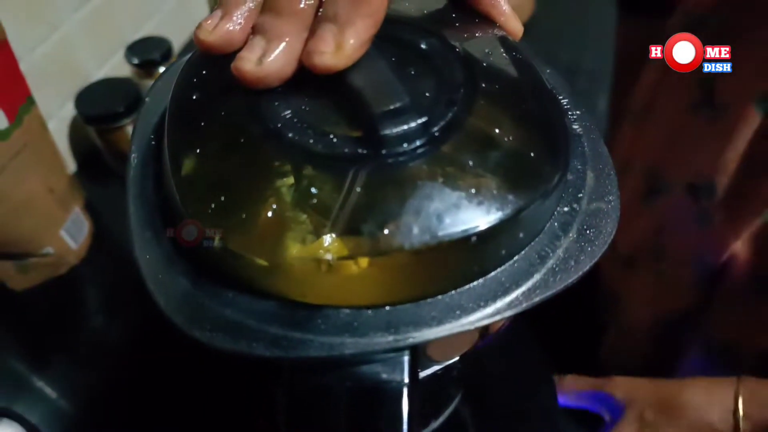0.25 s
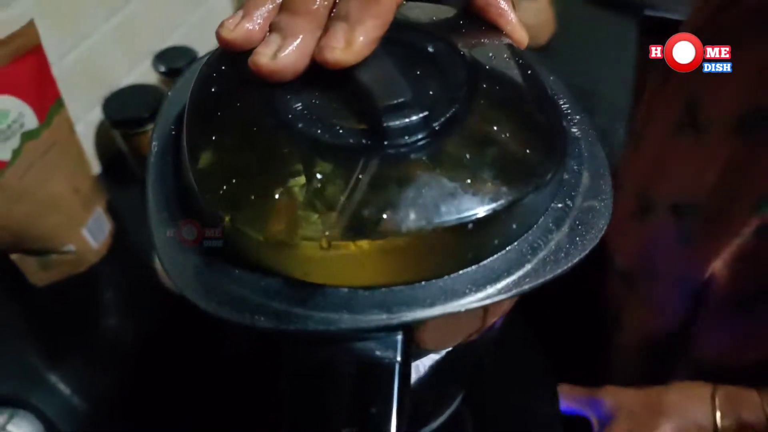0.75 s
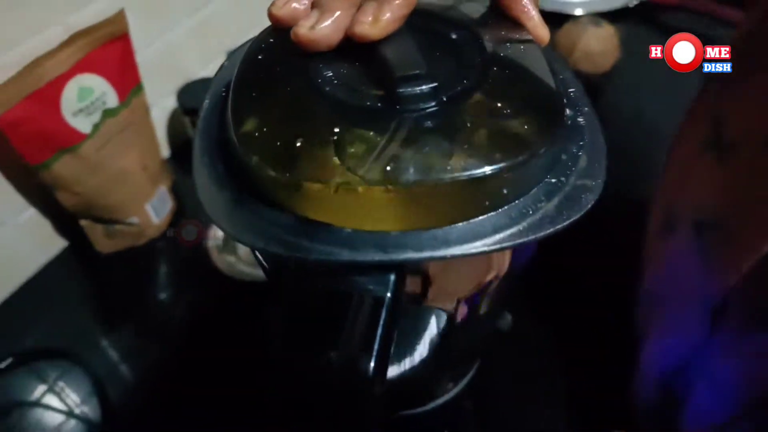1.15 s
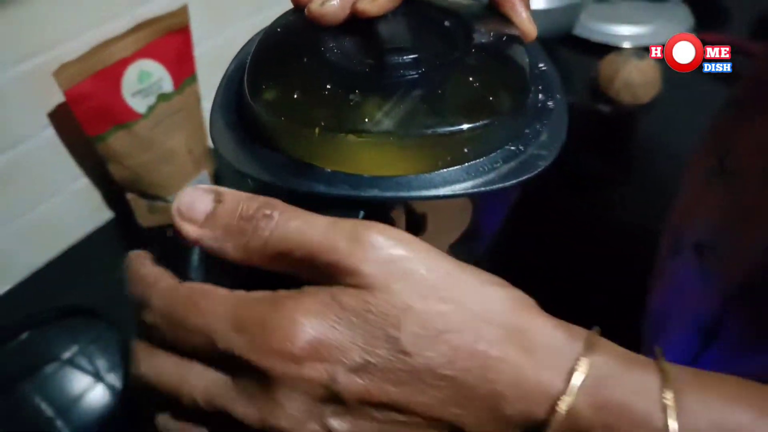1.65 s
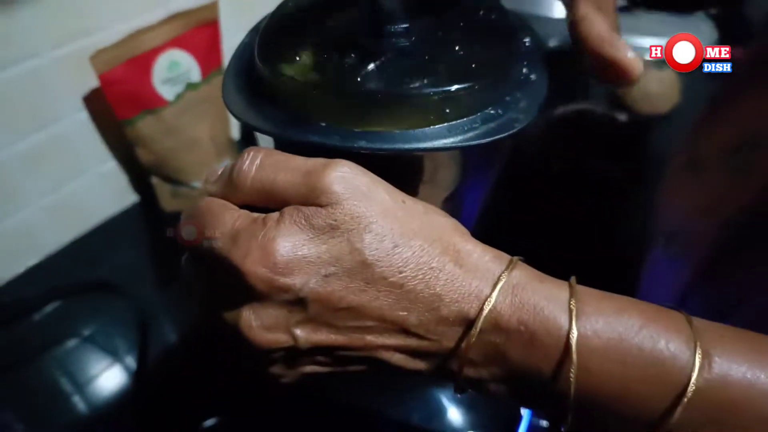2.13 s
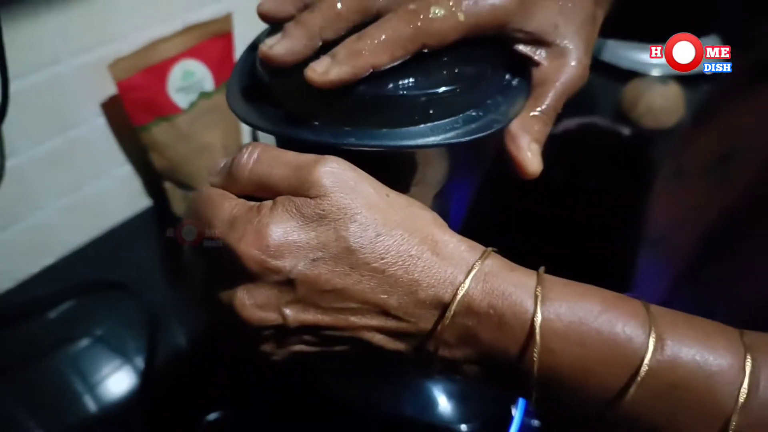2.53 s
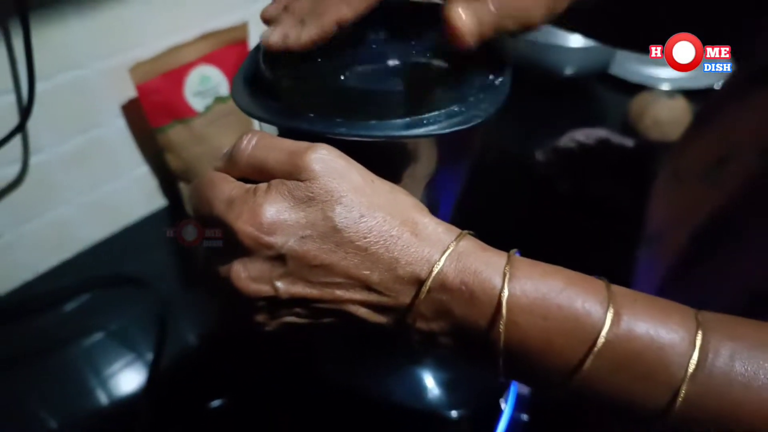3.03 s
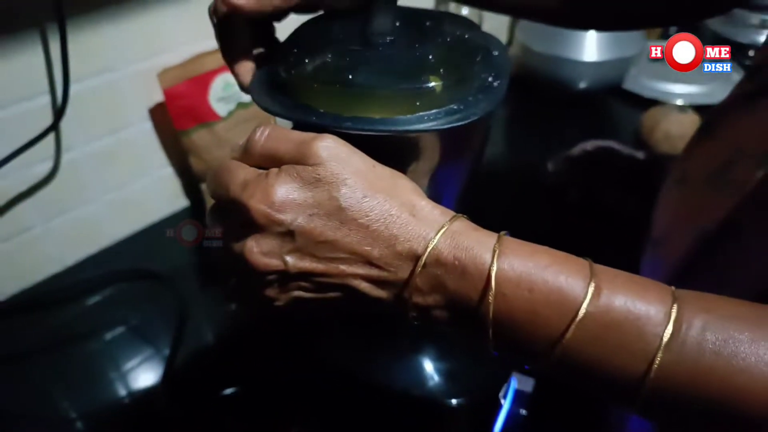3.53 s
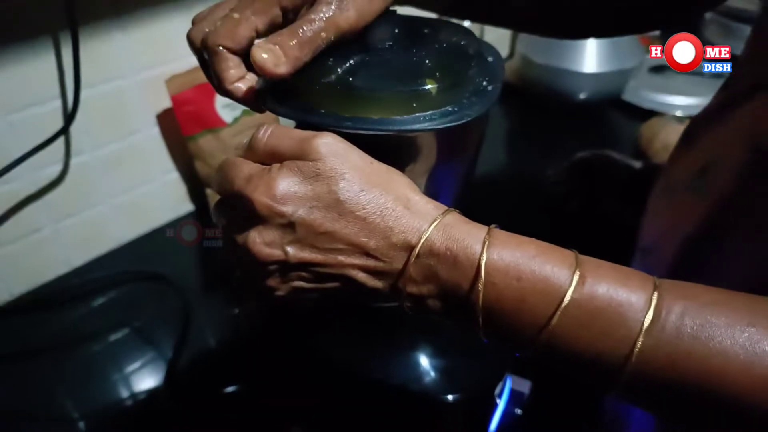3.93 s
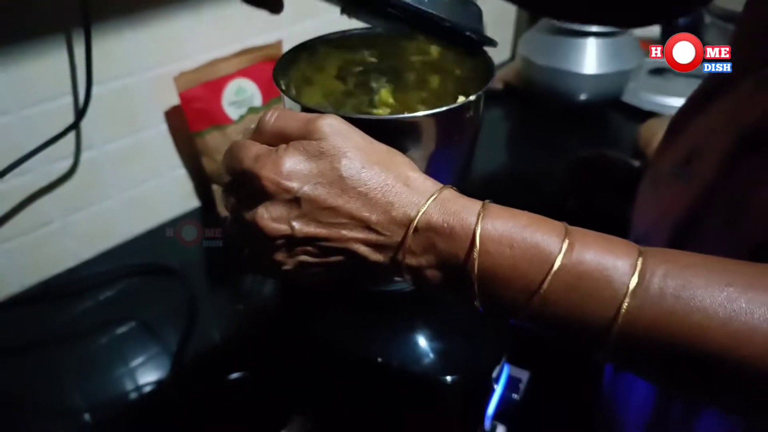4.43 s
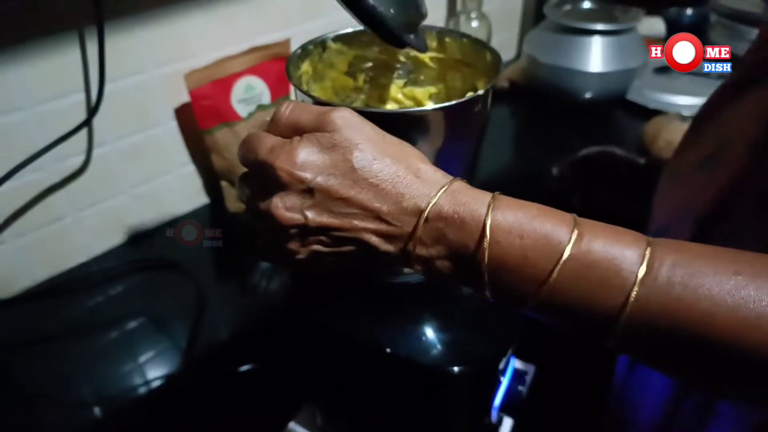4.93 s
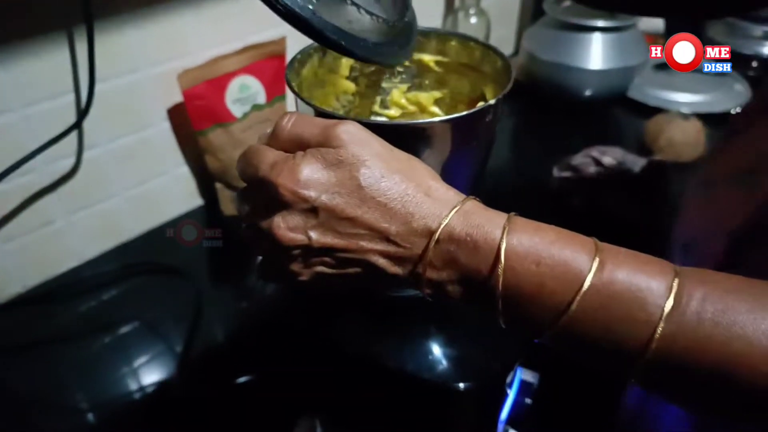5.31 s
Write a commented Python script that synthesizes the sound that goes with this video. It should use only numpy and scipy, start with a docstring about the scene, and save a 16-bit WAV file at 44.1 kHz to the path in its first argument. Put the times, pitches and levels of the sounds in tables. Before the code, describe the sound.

Close to a phone microphone in a small tiled kitchen, a thin hiss sits under a sharp knob click and soft thuds. Just after one second the mixer grinder lurches into motion, rattling and gurgling, then runs up quickly to a loud, rough whine. Wet lumps knock irregularly against the steel jar. Near the end the lid comes off and the roar becomes more open and bright.

```python
"""Mixer grinder in a small kitchen

The switch snaps and thuds, the drive stirs, then the motor runs up and its blade churns wet paste in a steel jar.
One shaft phase drives a hum, a whine and grinding noise, which rings the jar's air, wall and steel.
Lumps add blows and air pockets gurgle as gliding tones; a freer blade repeats more exactly turn by turn.
Near the end the lid is lifted and the jar takes its open, brighter colour. Short echoes of tiled walls
surround the machine, a thin steam-like hiss lies slightly right, and a phone rounds the peaks."""
import sys
import numpy as np
from scipy import signal
from scipy.fft import rfft, irfft, next_fast_len
from scipy.io import wavfile
from scipy.ndimage import uniform_filter1d, map_coordinates

SR = 44100
rng = np.random.default_rng(int(sys.argv[2]) if len(sys.argv) > 2 else 0)


def store_wav(level_fs):
    """Save 16-bit WAV to argv[1]."""
    pcm = np.round(np.clip(np.atleast_2d(level_fs), -1, 1) * 32767)
    wavfile.write(sys.argv[1], SR, pcm.T.astype(np.int16))


N = 245637
TIME_S = np.arange(N) / SR

# Background noise floor. Each row: frequency in Hz, relative density in dB per Hz.
FLOOR_COLOUR = [(60, -32), (150, 9), (900, -4), (1170, 9), (1400, -2), (3500, 4), (8000, -19)]
# Steam-like hiss. Each row: frequency in Hz, relative density in dB per Hz.
HISS_COLOUR = [(35, -67), (60, -32), (363, -24), (1380, -52), (2140, -33), (2300, -20.5), (3420, -50),
               (4640, -44.5), (7940, -27.5), (9350, -0.5), (10800, -27.5), (13900, -44), (16000, -40)]
# Whistling resonances of the hiss. Each row: centre in Hz, width in Hz, lift in dB.
HISS_WHISTLES = [(2400, 300, 9.8), (4720, 770, 23), (7250, 810, 14), (8430, 180, 13.5), (9760, 730, 4.9)]
# Decay of the kitchen's echoes. Each row: frequency in Hz, time to fall 60 dB in seconds.
KITCHEN_DECAY = [(200, 0.38), (2000, 0.14), (12000, 0.068)]
# Likeness of the two ears, clipped to -1..1. Each row: frequency in Hz, likeness.
EAR_LIKENESS = [(60, 0), (130, 1.8), (290, 0.6), (640, 0.74), (1410, 0.13), (3100, 0), (5000, -0.08),
                (7500, 0.83), (12000, 0.62)]
# Balance of the machine between the ears. Each row: frequency in Hz, left minus right in dB.
EAR_BALANCE = [(110, 6.5), (200, -2.5), (380, -1.5), (700, -1), (1290, 2.5), (2380, 1.5), (4400, -1.5),
               (8120, -0.5), (15000, 0)]

# Switch and drive contacts. Each row: start in seconds, click in dB, thud in dB.
CONTACTS = [(-0.008, -14, -48), (0.669, -16.5, -60), (0.67, -18.5, -50), (0.761, -48, -29),
            (0.817, -42, -42), (0.86, -39, -50), (1.004, -29.5, -30), (1.036, -27, -28)]
# Snap of the contacts. Each row: frequency in Hz, relative density in dB per Hz.
SNAP_COLOUR = [(180, -45), (300, -14), (440, -12), (1320, -24.5), (2070, -4), (2980, -11), (3240, -10),
               (6100, -5.5), (7440, -2.5), (11100, -9), (16000, -25)]
# Resonances of the knob. Each row: centre in Hz, width in Hz, lift in dB.
KNOB_MODES = [(2050, 270, 8.1), (4770, 260, 8.5), (7300, 250, 4.1)]
# Thud in the housing. Each row: frequency in Hz, relative density in dB per Hz.
THUD_COLOUR = [(60, -33), (130, -8), (215, 3), (330, -3), (480, -9), (800, -18), (1500, -25), (5000, -37)]

# The lid. Each row: time in seconds, opening from 0 to 1.
LID_OPENING = [(4.3, 0.01), (4.48, 0.99)]
# Resonances of the jar's base. Each row: centre in Hz, width in Hz, lift in dB.
BASE_MODES = [(1155, 62, 17), (1390, 300, 10)]
# Air pockets in the paste. Each row: middle in seconds, length in seconds, pitch at the middle in Hz,
# glide in Hz per second, level in dB.
AIR_POCKETS = [(1.14, 0.06, 415, -300, -25), (1.183, 0.035, 512, 300, -23), (1.225, 0.04, 432, 500, -23),
               (1.277, .03, 549, 2000, -26), (4.455, 0.054, 594, -400, -29), (4.551, .06, 565, 0, -30),
               (4.622, 0.14, 708, -200, -25.5)]
# Rumbling paste. Each row: frequency in Hz, relative density in dB per Hz.
PASTE_COLOUR = [(25, -43), (60, -42), (95, -40), (130, -3.5), (185, -1.5), (300, -1), (500, -10.5),
                (1500, -81)]
# Heavy paste heaving round the jar. Each row: time in seconds, relative level in dB.
HEAVE_LEVEL = [(1.1, -30), (1.26, -27), (1.34, -38), (3.05, -41.5), (3.15, -30.5), (3.5, -46), (4.36, -39),
               (4.44, -60), (5.51, -48), (5.57, -36)]
# Lumps passing the blade. Each row: middle in seconds, length in seconds, wall level in dB, steel level in dB.
LUMP_PASSES = [(1.157, 0.09, -30, -30), (1.442, 0.035, -20, -19), (1.6, 0.26, -24, -32),
               (1.792, 0.069, -20, -29), (1.95, 0.039, -17, -28), (2.074, 0.12, -21.5, -36),
               (2.19, 0.015, -16.5, -29), (2.344, 0.036, -16, -36), (2.466, 0.023, -19.5, -20),
               (2.53, 0.043, -18, -31), (2.644, 0.021, -24, -25), (2.75, 0.15, -20, -29),
               (2.99, 0.12, -26, -25), (3.074, 0.034, -22.5, -23.5), (3.167, 0.013, -17, -21),
               (3.224, 0.024, -20, -20), (3.324, 0.025, -20, -18), (3.417, 0.037, -23, -19),
               (3.688, 0.023, -17.5, -18), (3.875, 0.091, -20, -22.5), (4.04, 0.089, -20.5, -20.5),
               (4.186, 0.055, -19, -22.5), (4.565, 0.1, -21, -19.5), (4.855, 0.044, -23.5, -18),
               (4.985, 0.031, -19.5, -17.5), (5.1, 0.033, -17, -38), (5.444, 0.018, -17.5, -17.5)]

# Boom of the jar's air. Each row: frequency in Hz, relative density in dB per Hz.
BOOM_COLOUR = [(100, -64.5), (200, -9.5), (320, -6), (450, 4), (650, -4), (900, -1), (1300, -10.5),
               (3000, -64.5)]
# Air resonances tuned low, lid shut. Each row: centre in Hz, width in Hz, lift in dB.
AIR_LOW_SHUT = [(452, 70, 8.5), (608, 47, 10.5), (760, 190, -6)]
# Air resonances tuned low, lid open. Each row: centre in Hz, width in Hz, lift in dB.
AIR_LOW_OPEN = [(453, 26, 9.3), (738, 43, 10.2)]
# Air resonances with paste sloshing high, lid shut. Each row: centre in Hz, width in Hz, lift in dB.
AIR_HIGH_SHUT = [(485, 48, 3.5), (760, 230, -7.5)]
# Air resonances with paste sloshing high, lid open. Each row: centre in Hz, width in Hz, lift in dB.
AIR_HIGH_OPEN = [(492, 55, 10.5), (770, 150, 12)]
# Chopping on the jar's wall. Each row: frequency in Hz, relative density in dB per Hz.
CHOP_COLOUR = [(300, -26.5), (700, -7), (1000, -2.5), (1700, -1.5), (2400, 2), (3300, 2.5), (4800, -2),
               (6500, -4.5), (12000, -22)]
# Wall resonances, lid shut. Each row: centre in Hz, width in Hz, lift in dB.
WALL_SHUT = [(969, 42, 7.5), (1200, 290, 9.2), (1512, 210, 8), (1663, 60, 16.7), (1930, 200, 7.7),
             (2440, 55, 5.9), (2704, 35, 8.3)]
# Wall resonances, lid open. Each row: centre in Hz, width in Hz, lift in dB.
WALL_OPEN = [(1060, 59, -3), (1275, 64, 7), (1870, 180, 12.5), (4750, 270, 6.5)]
# Wall ring under a lump. Each row: frequency in Hz, relative density in dB per Hz.
RING_COLOUR = [(100, -39), (1300, -13.5), (1800, -5.5), (2300, -4), (5000, -28)]
# Paste flung at the steel, lid shut. Each row: frequency in Hz, relative density in dB per Hz.
SPRAY_SHUT = [(2000, -25.5), (4200, 0), (5500, 0.5), (7000, -1), (8400, 0), (8700, -4.5), (9600, -7),
              (11000, -11), (13000, -20.5), (16000, -50.5)]
# Paste flung at the steel, lid open. Each row: frequency in Hz, relative density in dB per Hz.
SPRAY_OPEN = [(2000, -28.5), (4200, -6), (5500, 0.5), (7000, -1.5), (8400, 3.5), (8700, -4), (9600, -4),
              (11000, -7), (13000, -14), (16000, -16)]
# Resonances of the steel. Each row: centre in Hz, width in Hz, lift in dB.
STEEL_MODES = [(6430, 70, 6.3), (6570, 140, 5.8), (7400, 880, 6.4), (8310, 95, 4.1), (8456, 125, 5.4)]
# Spray between the lumps. Each row: time in seconds, level in dB before bite, freedom and surge.
SPRAY_LEVEL = [(1.3, -22.5), (1.5, -22), (2.31, -21), (2.46, -22.5), (2.92, -21.5), (3.17, -25.5),
               (3.54, -23.5), (3.86, -24.5), (4.25, -19.5), (4.76, -18), (5.57, -17.5)]

# Hum of the unbalanced shaft. Each row: time in seconds, level in dB rms before its sway.
HUM_LEVEL = [(1.25, -30), (1.335, -22.5), (1.4, -31), (1.7, -32.5), (1.84, -41), (1.92, -30), (2.05, -27.5),
             (2.18, -36), (2.32, -32.5), (2.66, -35), (2.78, -29), (3.16, -25.5), (3.24, -32), (3.4, -23),
             (3.49, -37), (3.55, -23.5), (3.66, -34), (3.78, -23), (4.02, -24), (4.16, -29), (4.33, -29),
             (4.5, -47), (4.72, -33), (4.87, -48), (4.98, -38), (5.25, -36), (5.57, -40)]
# The shaft after break-through. Each row: time in seconds, turns per second before smoothing and jerks.
SHAFT_SPEED = [(1.3, 186), (1.42, 234), (1.52, 247), (1.68, 244), (1.82, 235), (1.92, 246), (2.1, 251),
               (2.3, 252), (2.36, 248), (2.44, 253), (2.54, 247), (2.61, 253), (2.74, 247), (3.0, 245),
               (3.18, 252), (3.26, 246), (3.42, 248), (3.49, 236), (3.55, 251), (3.63, 255), (3.71, 246),
               (3.86, 249), (3.95, 246), (4.14, 247), (4.4, 243), (4.64, 231), (4.73, 246), (4.88, 238),
               (4.98, 247), (5.07, 235), (5.2, 248), (5.3, 255), (5.39, 254), (5.44, 238), (5.57, 250)]
# Spells with their own freedom of spin, mostly freer than in thick paste.
# Each row: start in seconds, length in seconds, freedom from 0 to 1, whine gain in dB.
SPIN_SPELLS = [(1.436, 0.41, 0.16, 5.5), (1.899, 0.3, 0.48, 4), (2.173, 0.32, 0.54, 0),
               (2.542, 0.21, 0.56, -3), (3.084, 0.13, 0.5, 1.5), (3.501, 0.19, 0.92, 0.5),
               (3.748, 0.15, 0.38, 4), (3.888, 0.11, 0.62, -5), (4.102, 0.127, 0.72, 0),
               (4.697, 0.14, 0.29, 6), (4.914, 0.12, 0.3, 2.5), (5.183, 0.23, 0.68, 4.5),
               (5.51, 0.16, 0.34, 3)]
# Whine. Each row: multiple of shaft speed, relative dB lid shut, relative dB lid open, dB gained at full freedom.
WHINE_LINES = [(2, -33, -27, -4), (3, -34, -28.5, 0), (3.5, -38, -38, -20), (4, -36, -36, 6),
               (5, -32, -37, 10), (6, -36, -42, -1), (7, -27, -36, 7), (8, -33, -34, -7), (9, -32, -36, 1),
               (10, -31, -34, 3), (11, -28, -36, -10)]

# before take-off
STIR_S, STIR_DB, STIR_DB_PER_S = 0.76, -50.5, 40
RUMBLE_DB, RUMBLE_DB_PER_S = -55.5, 76
# take-off: start s, labouring speed Hz, middle and time constant of the surge s, time to bite into the paste s
START_S, LABOUR_HZ, BREAK_S, SURGE_S, BITE_S = 1.095, 105, 1.295, 0.035, 0.047
HUM_FROM_S = 1.255
INERTIA_S = 0.04  # the shaft speed is averaged over this time
TUMBLE_DB, TUMBLE_DB_PER_S = -18.5, -57
# churning, before the load shapes it: (dB with the lid shut, dB with the lid open)
BOOM_DB, CHOP_DB = (-27, -25), (-20, -21)
COARSE_DB, COARSE_S = (3, 2.5), 0.62  # extra boom and chop of unground paste; its decay time constant
FREE_DROP_DB = (13, 2.5, 1)  # boom, chop and spray lost at full freedom
SLOW_DROP_DB = 2  # chop lost before the surge
LOADED_FREEDOM, SPELL_EDGE_S = 0.297, 0.052  # freedom in thick paste; time to enter or leave a spell
SCRAPE_SHARE = 0.68  # loose grains keep the repeating scrape below this share of the power
LUMP_BOOM_DB = -10  # the air's share of a lump's wall level
LULL_AFTER_S, LULL_S, LULL_DB = 0.035, 0.14, (1, 0.96)  # delay, length, chop and spray lost
# a lump's wall ring: (Hz, width Hz, lift dB), and its level over the blow
RING_SHUT, RING_OPEN, RING_DB = [(1648, 220, 16)], [(1860, 140, 9.5)], -5
SPECK_RATE, SPECK_DB = 61, 16.5  # mean hard bits a second, and their gain before the drag
UNEVEN_DB = 2.5  # depth of the churning's unevenness over time and frequency
TOP_HZ = 16050


def amp(db):
    """Decibels to gain."""
    return 10 ** (np.asarray(db) / 20)


def unit(x):
    """Scale to rms 1."""
    return x / np.sqrt(np.mean(x ** 2) + 1e-20)


def along(points, hz):
    """Read (Hz, value) points on a log axis."""
    f, v = np.transpose(points)
    return np.interp(np.log(hz + 1), np.log(f + 1), v)


def curves(rows):
    """One value per sample for each column after the time."""
    s, *columns = np.transpose(rows)
    return [np.interp(TIME_S, s, column) for column in columns]


def since(start):
    """Seconds since start, zero before it."""
    return np.maximum(TIME_S - start, 0)


def ramp(start, length):
    """Rise from 0 to 1 over length seconds."""
    return np.clip(since(start) / length, 0, 1)


def wobble(rate):
    """A smooth random curve, rate knots a second."""
    knots = rng.standard_normal(int(N * rate / SR) + 4)
    return map_coordinates(knots, [np.arange(N) * rate / SR])


def noise():
    """Two unrelated white noises."""
    return rng.standard_normal((2, N))


def bursts(times, levels_db, rise, t60):
    """Envelope of blows that swell and die."""
    t = since(np.asarray(times)[:, None])
    decay = amp(np.asarray(levels_db)[:, None] - 60 * t / t60)
    return np.linalg.norm(decay * (1 - np.exp(-t / rise)), axis=0)


def filtered(x, response):
    """Multiply the spectrum of x by a response of frequency."""
    size = 2 * next_fast_len(N // 2 + SR // 4)
    return irfft(rfft(x, size) * response(np.fft.rfftfreq(size, 1 / SR)), size)[..., :N]


def body(x, colour, modes=()):
    """Ring x through a causal colour with resonances, keeping the power of white noise."""
    def response(hz):
        lifts = sum(db / (1 + (2 * (hz - centre) / width) ** 2) for centre, width, db in modes)
        gain = amp(along(colour, hz) + lifts)
        # folding the cepstrum gives minimum phase: nothing sounds before the blow
        cepstrum = irfft(np.log(unit(gain) + 1e-9))
        return np.exp(rfft(2 * cepstrum[:len(hz) - 1], len(cepstrum)) - cepstrum[0])
    return filtered(x, response)


def spread(pair):
    """Mix two unrelated signals into left and right with the ears' likeness at each frequency."""
    def mid_side(hz):
        turn = np.arccos(np.clip(along(EAR_LIKENESS, hz), -1, 1)) / 2
        return np.array([np.cos(turn), np.sin(turn)])
    mid, side = filtered(pair, mid_side)
    return np.array([mid + side, mid - side])


def lid_opening():
    """Opening of the lid, 0-1."""
    return np.clip(curves(LID_OPENING)[0], 0, 1)


def by_lid(shut_db, open_db):
    """A gain that passes from its shut to its open level as the lid lifts."""
    return amp(shut_db + lid_opening() * (open_db - shut_db))


def jar(force, shut, opened):
    """The jar's ring passes from its shut to its open colour as the lid lifts."""
    lid = lid_opening()
    return spread(np.sqrt(1 - lid) * body(force, *shut) + np.sqrt(lid) * body(force, *opened))


def noise_floor():
    """The background noise floor rises slightly, with a faint band near 1.2 kHz."""
    return amp(-57.5) * ramp(0.37, 0.03) * spread(body(noise(), FLOOR_COLOUR))


def steam():
    """A thin steam-like hiss with whistling resonances, slightly right."""
    hiss = spread(body(noise() * amp(0.43 * wobble(96)), HISS_COLOUR, HISS_WHISTLES))
    return amp(-34.5) * hiss * amp([[-1.3], [1.3]])


def kitchen(x):
    """Tiled walls answer briefly: noise tails that decay at a different rate at each frequency."""
    hz, t, z = signal.stft(rng.standard_normal((2, SR // 3)), SR, nperseg=256)
    decay = amp(-60 * t / along(KITCHEN_DECAY, hz)[:, None])
    tail = signal.istft(z * decay, SR, nperseg=256)[1]
    tail = tail / np.linalg.norm(tail[0])
    return spread(signal.fftconvolve(x.mean(0)[None], tail, axes=1)[:, :N])


def switch():
    """Contacts snap in the plastic knob and thud in the housing, as filtered noise bursts."""
    s, click_db, thud_db = np.transpose(CONTACTS)
    snap = bursts(s, click_db, rise=0.00039, t60=0.039)
    snap += bursts(s, click_db - 13.0, rise=0.005, t60=0.31)  # a fainter, longer tail
    thud = bursts(s, thud_db, rise=0.0015, t60=0.11)
    return spread(body(snap * noise(), SNAP_COLOUR, KNOB_MODES) + body(thud * noise(), THUD_COLOUR))


def stir():
    """Before take-off the drive scrapes and the paste rumbles, both swelling steadily."""
    gate = ramp(STIR_S, 0.014) * (1 - ramp(START_S, BITE_S))
    t = np.minimum(since(STIR_S), 1)
    rough = noise() * amp(3.3 * wobble(91.3))
    scrape = amp(STIR_DB + STIR_DB_PER_S * t) * spread(body(rough, CHOP_COLOUR))
    rumble = amp(RUMBLE_DB + RUMBLE_DB_PER_S * t) * spread(body(noise(), PASTE_COLOUR))
    return gate * (scrape + rumble)


def tumble():
    """Coarse pieces rattle on the jar's base at take-off and die away."""
    knocks = unit(noise() * amp(1.9 * wobble(400)))
    level = ramp(START_S, BITE_S) ** 2 * amp(TUMBLE_DB + TUMBLE_DB_PER_S * since(START_S + BITE_S))
    colour = [(400, -33), (800, 10), (1500, -3), (2200, -25), (5000, -24)]  # Hz, relative dB per Hz
    return level * spread(body(knocks, colour, BASE_MODES))


def gurgles():
    """Each pocket of air swells, glides and fades with an unsteady tone."""
    out = np.zeros(N)
    unsteady = 0.9 + 0.3 * (wobble(70) + 1j * wobble(70))
    for middle, length, hz, glide, db in AIR_POCKETS:
        t = TIME_S - middle
        near = np.abs(t) < 2 * length
        t = t[near]
        cycles = hz * t + glide * t * t / 2 + rng.random()
        ring = np.exp(2j * np.pi * cycles) * unsteady[near]
        out[near] += amp(db) * np.exp(-(2 * t / length) ** 2) * np.sqrt(2) * ring.real
    return out


def lumps():
    """Each lump swells and fades as it passes the blade: wall and steel gains, and the lull (0-1) behind it."""
    s, length, wall_db, steel_db = np.transpose(LUMP_PASSES)[:, :, None]

    def bump(middle, width):
        return np.exp(-np.minimum((2 * (TIME_S - middle) / width) ** 2, 20))

    power = bump(s, length)
    on_wall = np.sqrt((amp(wall_db) ** 2 * power).sum(0))
    on_steel = np.sqrt((amp(steel_db) ** 2 * power).sum(0))
    lull = np.minimum(bump(s + LULL_AFTER_S, LULL_S).sum(0), 1)
    return on_wall, on_steel, lull


def specks():
    """Sparse sharp blows of hard bits at random instants."""
    return (rng.random(N) < SPECK_RATE / SR) * noise() * amp(SPECK_DB)


def uneven(pair):
    """A random smooth gain over time and frequency makes the churning uneven."""
    z = signal.stft(pair, nperseg=512)[2]
    field = uniform_filter1d(rng.standard_normal(z.shape[1:]), size=5, axis=0)  # smooth over frequency
    field = uniform_filter1d(field, size=7, axis=1)  # smooth over time
    return unit(signal.istft(z * amp(UNEVEN_DB * unit(field)), nperseg=512)[1][:, :N])


def sloshing(force):
    """The air above the paste changes shape, so its resonances wander between a low and a high tuning."""
    high = 0.5 + 0.5 * np.tanh(1.5 * wobble(18))
    low_ring = jar(np.sqrt(1 - high) * force, (BOOM_COLOUR, AIR_LOW_SHUT), (BOOM_COLOUR, AIR_LOW_OPEN))
    swapped = np.sqrt(high) * force[::-1]  # swapped channels keep the two rings unrelated
    return low_ring + jar(swapped, (BOOM_COLOUR, AIR_HIGH_SHUT), (BOOM_COLOUR, AIR_HIGH_OPEN))


def spell_gates():
    """One gate (0-1) for each spell with its own freedom of spin."""
    s, length = np.transpose(SPIN_SPELLS)[:2, :, None]
    return ramp(s, SPELL_EDGE_S) - ramp(s + length - SPELL_EDGE_S, SPELL_EDGE_S)


def freedom():
    """How freely the blade spins (0-1), and the shaft speed (Hz) smoothed by the rotor's inertia."""
    spell = np.transpose(SPIN_SPELLS)[2][:, None]
    free = LOADED_FREEDOM + ((spell - LOADED_FREEDOM) * spell_gates()).sum(0)
    speed = uniform_filter1d(curves(SHAFT_SPEED)[0], max(int(INERTIA_S * SR), 1))
    return np.clip(free, 0, 0.95), speed


def grinding(turns, share, clump_db, pulse_db, flutter_db, count=64):
    """Force on the jar: a fine scrape repeating every turn plus clumps of loose grains, pulsed by the turn."""
    orders = np.exp(2j * np.pi * rng.random((2, count)))
    orders[:, :round(WHINE_LINES[-1][0]) + 1] = 0  # the scrape lies above the whine
    one_turn = irfft(orders, count * count)
    # under load, play in the coupling frays the highest overtones
    angle = (turns + 0.007 * (1 - np.clip(share, 0, 1)) * wobble(150)) % 1
    scrape = unit(one_turn[:, (angle * count * count).astype(int)])
    grains = unit(noise() * amp(clump_db * wobble(1100) + flutter_db * wobble(130)))
    share = np.clip(share, 0, 0.95)
    force = np.sqrt(share) * scrape + np.sqrt(1 - share) * grains
    return unit(force * amp(pulse_db * np.cos(2 * np.pi * turns)))


def whine(turns, drag):
    """Overtones of the blade, rough and fitful in paste; a rocking load adds a line halfway between."""
    tones = np.zeros((2, N))
    lid, unloaded = lid_opening(), (1 - drag) ** 4
    spell_db = (np.transpose(SPIN_SPELLS)[3][:, None] * spell_gates()).sum(0)
    for order, shut_db, open_db, sing_db in WHINE_LINES:
        waver_db = drag * (3 * wobble(11) + 3.5 * wobble(45))
        roughness = 0.16 * order * drag * wobble(70)
        phase = 2 * np.pi * (order * turns + rng.random()) + roughness
        level_db = shut_db + lid * (open_db - shut_db) + spell_db + waver_db + sing_db * unloaded
        strength = amp(level_db) * (1 - drag) ** (order / 8)  # drag dulls high orders most
        tones += strength * np.sqrt(2) * np.array([np.sin(phase), np.cos(phase)])
    return spread(tones)


def grinder():
    """One shaft drives the hum, the whine, the boom of the jar's air, the chopping and the spray on the steel."""
    run_up = 0.5 + 0.5 * np.tanh((TIME_S - BREAK_S) / SURGE_S)
    bite = ramp(START_S, BITE_S) ** 2
    free, full_speed = freedom()
    speed = LABOUR_HZ + run_up * (full_speed - LABOUR_HZ)
    drag, coarse = 1 - free, np.exp(-since(START_S) / COARSE_S)

    # the load: heavy at first, lighter the more freely the blade spins
    boom_db = COARSE_DB[0] * coarse - FREE_DROP_DB[0] * free ** 4
    chop_db = COARSE_DB[1] * coarse - FREE_DROP_DB[1] * free ** 2 - SLOW_DROP_DB * (1 - run_up)
    boom = bite * by_lid(*BOOM_DB) * amp(boom_db)
    chop = bite * by_lid(*CHOP_DB) * amp(chop_db)
    spray = bite * amp(curves(SPRAY_LEVEL)[0] - FREE_DROP_DB[2] * free ** 2)

    # uneven paste jerks the shaft and shifts its unbalance
    jerk = drag * (0.004 * wobble(28) + 0.006 * wobble(140))
    turns = np.cumsum(speed * (1 + jerk)) / SR
    sway = amp(2 * drag * wobble(30))
    hum_gain = ramp(HUM_FROM_S, BITE_S) * amp(curves(HUM_LEVEL)[0]) * sway
    hum = hum_gain * np.sqrt(2) * np.sin(2 * np.pi * turns)
    # the whine follows the square root of the chopping level
    tones = np.sqrt(unit(chop)) * whine(turns, drag)

    air = sloshing(grinding(turns, SCRAPE_SHARE * free, clump_db=0.5, pulse_db=0.0, flutter_db=2.0))
    wall_force = grinding(turns, SCRAPE_SHARE * free ** 1.45, clump_db=1.0, pulse_db=-1, flutter_db=1.47)
    wall_force = uneven(wall_force) + drag * specks()
    wall = jar(wall_force, (CHOP_COLOUR, WALL_SHUT), (CHOP_COLOUR, WALL_OPEN))
    steel_force = grinding(turns, SCRAPE_SHARE * free ** 1.5, clump_db=2.0, pulse_db=-0.5, flutter_db=1.5)
    steel = jar(uneven(steel_force), (SPRAY_SHUT, STEEL_MODES), (SPRAY_OPEN, STEEL_MODES))

    # the paste surges, partly all at once and partly place by place; lumps add to air, wall and steel
    surge = amp(0.97 * drag * wobble(25.895))
    on_wall, on_steel, lull = lumps()
    air_surge = surge * amp(2 * drag * wobble(26))
    wall_surge = surge * amp(1.0 * drag * wobble(13) - LULL_DB[0] * lull)
    steel_surge = surge * amp(2.0 * drag * wobble(13) - LULL_DB[1] * lull)
    churn = air * np.hypot(air_surge * boom, amp(LUMP_BOOM_DB) * on_wall)
    churn += wall * np.hypot(wall_surge * chop, on_wall)
    churn += steel * np.hypot(steel_surge * spray, on_steel)
    churn += amp(RING_DB) * on_wall * jar(noise(), (RING_COLOUR, RING_SHUT), (RING_COLOUR, RING_OPEN))

    heave_db = 1.0 + curves(HEAVE_LEVEL)[0] + 4.9 * drag * wobble(17)
    heave = bite * amp(heave_db) * spread(body(noise(), PASTE_COLOUR))
    return hum + tones + churn + heave


def scene():
    """Grinder and switch with the kitchen's echoes, leaning between the ears, plus hiss and noise floor."""
    machine = grinder() + stir() + tumble() + gurgles() + switch()
    heard = machine + amp(-13) * kitchen(machine)
    leaning = filtered(heard, lambda hz: amp(np.outer([1, -1], along(EAR_BALANCE, hz)) / 2))
    return leaning + steam() + noise_floor()


def record(dry):
    """The phone rounds off the highest peaks and keeps nothing above its band limit."""
    rounded = dry / (1 + np.abs(dry / 0.85) ** 6) ** (1 / 6)
    return filtered(rounded, lambda hz: hz < TOP_HZ)


dry = scene()
out = record(dry)
store_wav(out)
```